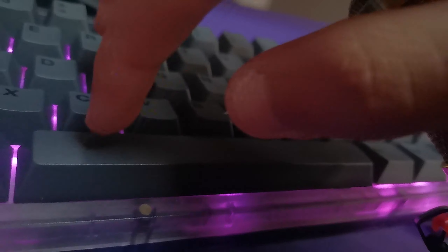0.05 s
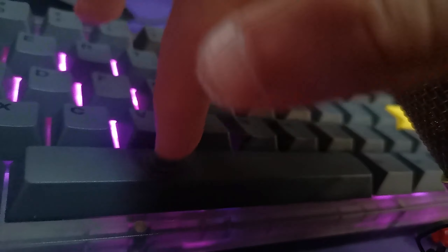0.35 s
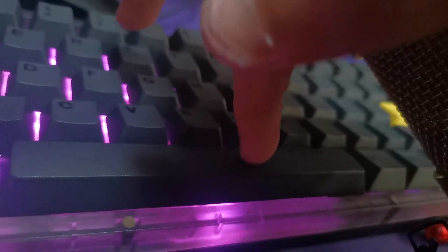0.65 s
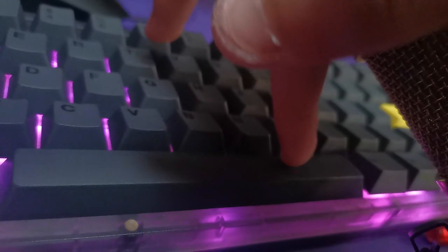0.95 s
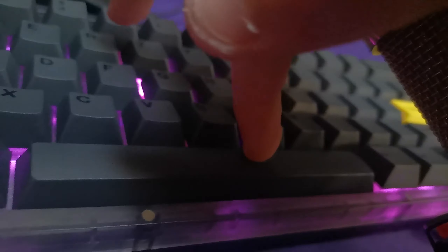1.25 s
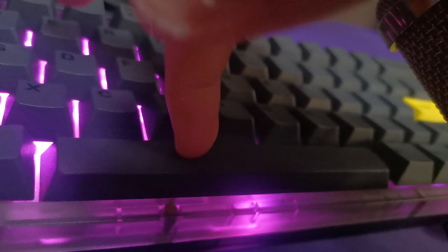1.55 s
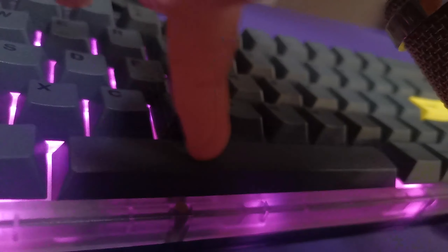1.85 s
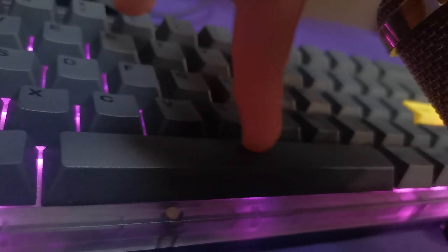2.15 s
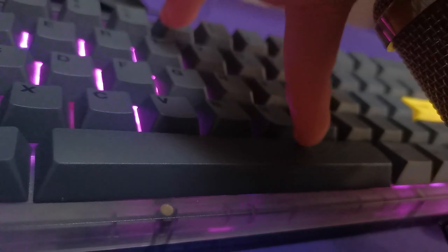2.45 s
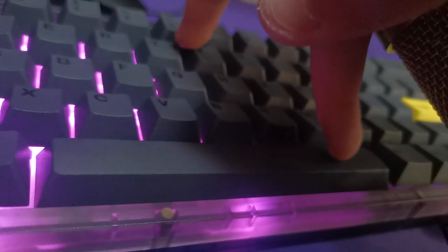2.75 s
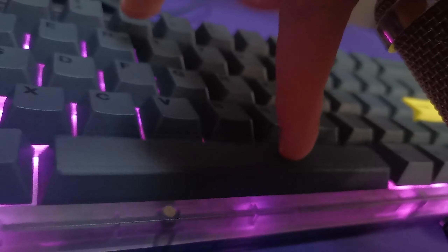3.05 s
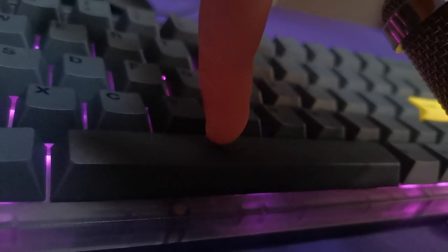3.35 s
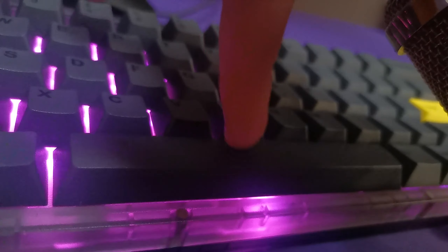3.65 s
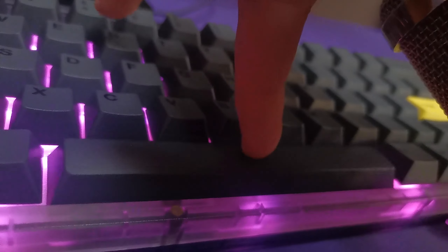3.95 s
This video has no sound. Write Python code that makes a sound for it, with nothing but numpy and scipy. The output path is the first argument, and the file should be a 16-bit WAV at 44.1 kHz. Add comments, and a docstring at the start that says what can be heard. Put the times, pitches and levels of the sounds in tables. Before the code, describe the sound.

A mechanical keyboard's space bar is tapped rapidly, close up in a quiet room. From about 0.3 seconds, presses come roughly six times a second, each a plastic clack with a soft desk thud, followed by a second clack as the bar springs back. Near 2.8 seconds the sound drops out briefly; tapping resumes around 3 seconds and continues until 4. Faint hiss and low rumble lie underneath.

```python
"""Quiet room, close to a mechanical keyboard on a desk: one finger taps the space bar about 6 times a second.
Per stroke: soft fingertip thump, plastic clack at bottom-out, second clack as the bar springs back.
Case and desk thud under each blow; skin scuffs the keycap. Faint hiss and desk rumble underneath.
The sound drops out once, briefly, and cuts back in with a faint click and a barely audible subsonic swell."""
import sys
import numpy as np
from scipy import signal
from scipy.fft import rfft, irfft, next_fast_len
from scipy.io import wavfile

SR = 44100
rng = np.random.default_rng(int(sys.argv[2]) if len(sys.argv) > 2 else 0)


def dump(signal):
    """Clip the signal to [-1, 1] and save it as 16-bit WAV at the path in sys.argv[1]."""
    limited = np.clip(np.atleast_2d(signal).T, -1, 1)
    pcm = np.round(limited * 32767).astype(np.int16)
    wavfile.write(sys.argv[1], SR, pcm)


N = 176400

# bar bottoms out: start_s, clack_db, treble_db, thud_db, finger_travel_s
PRESSES = [(0.2844, -44.5, -65.5, -44, 0.023), (0.4378, -37.5, -47, -36, 0.017),
           (0.6105, -43.5, -57.5, -39, 0.022), (0.7583, -42.5, -56.5, -39.5, 0.025),
           (0.92, -44.5, -67.5, -42.5, 0.026), (1.0787, -48.5, -72.5, -48.5, 0.038),
           (1.227, -39, -52.5, -38, 0.019), (1.4048, -42.5, -57, -40.5, 0.034),
           (1.565, -44, -59.5, -43.5, 0.034), (1.7191, -43.5, -55.5, -40, 0.0284),
           (1.8736, -41, -53.5, -38.5, 0.021), (2.029, -44.5, -59, -42, 0.038),
           (2.1906, -43.5, -56, -41.5, 0.0253), (2.364, -42.5, -55.5, -39.5, 0.026),
           (2.529, -41, -56, -39.5, 0.0245), (2.7009, -42.5, -58.5, -43.5, 0.032),
           (3.0533, -43.5, -61, -43.5, 0.0299), (3.2403, -43.5, -56, -41.5, 0.026),
           (3.4156, -44, -55.5, -39, 0.024), (3.5784, -42.5, -52.5, -37, 0.018),
           (3.7432, -40, -51, -36, 0.022), (3.916, -42.5, -52.5, -35.5, 0.019)]
# bar hits its top stop: start_s, clack_db, treble_db, thud_db, ping_db
RELEASES = [(0.3606, -38.5, -65.5, -43, -1), (0.5169, -42, -57.5, -45.5, -5), (0.6784, -46, -56, -47.5, 4),
            (0.8311, -43.5, -58.5, -46, 7), (1.0054, -60, -73, -63, 10), (1.1507, -42.5, -54.5, -43, 10.5),
            (1.313, -44, -56, -47, 10), (1.4904, -47, -63, -48.5, 5), (1.6495, -42.5, -56, -45, 4.5),
            (1.801, -43, -56.5, -41.5, 1.5), (1.9576, -49.5, -64, -47, 0),
            (2.1073, -44.5, -60.5, -44.5, -1), (2.2756, -43.5, -61.5, -49.5, -4),
            (2.4472, -43, -54.5, -49, 7), (2.6203, -45, -56, -46.5, 7), (2.785, -46, -57.5, -51.5, 7),
            (3.1361, -45.5, -56, -46, 8), (3.3232, -45.5, -60.5, -46.5, 10), (3.4967, -40, -53, -44.5, 8.5),
            (3.6563, -47, -57.5, -44, 6), (3.821, -43, -58, -47.5, 4), (3.9845, -40.5, -51.5, -45.5, 7)]
# faint clicks, the last as the sound cuts back in: start_s, level_db
FAINT_CLICKS = [(.259, -54.5), (.423, -56), (1.786, -54), (2.968, -60)]
# skin slides on the keycap: centre_s, level_db
SCUFFS = [(0.427, -72.5), (0.736, -70), (0.901, -67.5), (1.138, -71), (1.301, -64.5), (1.469, -64),
          (1.637, -67), (1.795, -64), (2.019, -64), (2.077, -68), (2.171, -68.5), (2.354, -67),
          (2.512, -69), (3.12, -70)]
# plastic bar: pitch_hz, t60_s, press_db, release_db
BAR_MODES = [(646, 0.0088, 4, -14), (806, 0.051, -13.5, -13.5), (1484, 0.032, -7.5, -12.5),
             (1740, 0.023, -3, -7), (2185, 0.0086, -5, -14), (2430, 0.013, -2.5, -21),
             (2781, 0.025, -8.5, -8), (3110, 0.027, -16, -21), (4940, 0.0064, -1.5, -8),
             (5320, 0.0078, -4, 0.5), (9634, 0.0075, 2.5, -10.5)]
# case: pitch_hz, t60_s, press_db, release_db
CASE_MODES = [(327.6, 0.046, -0.5, 0.5), (460, 0.027, -15.5, -7)]
# keyboard on the desk: pitch_hz, t60_s, press_db, release_db, touch_db
DESK_MODES = [(82.3, 0.12, 4, -36, -20.5), (134.1, 0.14, 5, -3, 0), (182.7, 0.067, 5, 10, 2)]
# plastic contact: freq_hz, level_db
CRACK_SPECTRUM = [(200, 7.5), (950, -19), (1300, -9), (1720, 5.5), (2600, -2), (4000, -13), (5200, -10.5),
                  (6500, -14.5), (9500, -12), (15000, -32.5)]
# hollow of the case: freq_hz, level_db
HOLLOW_SPECTRUM = [(130, -14.5), (290, 4.5), (600, -4.5), (1600, -48)]
# skin friction: freq_hz, level_db
SKIN_SPECTRUM = [(1500, 6), (2500, 1), (2950, 10.5), (3700, -10), (8000, 10.5), (10500, 3.5), (15000, -11)]
# steady hiss: freq_hz, level_db
HISS_SPECTRUM = [(250, 0), (1000, -6), (2000, -7.5), (2900, -13), (3900, -27), (5200, -19), (8000, -14),
                 (12200, -21), (13700, -55)]
# desk rumble: freq_hz, level_db
RUMBLE_SPECTRUM = [(10, -2), (60, -4), (140, -7.5), (220, -21), (380, -25), (900, -64)]

PRESS, RELEASE, TOUCH = 0, 1, 2  # level column in the mode tables
CRACK_DB, CHATTER_DB, THUD_DB = 24, -9, -1.5
REF_CLACK_DB, REF_TREBLE_DB = -40, -11
TREBLE_FROM_HZ, PING_BAND_HZ = 4740, (2600, 3300)
TIME_S, RING_TIME_S = np.arange(N) / SR, np.arange(SR // 5) / SR


def presses(soft_s=0.0013, finger_push_s=0.0009, sink_lag_s=0.0078):
    """Fingertip lands; bar bottoms out and shakes the desk; case sinks on its feet and comes back."""
    out = np.zeros(N)
    fingertip = np.exp(-np.linspace(-4, 4, round(8 * soft_s * SR)) ** 2 / 2)
    sink = -amp(2.5) * sway(width_s=0.0023)
    for start_s, clack_db, treble_db, thud_db, travel_s in PRESSES:
        add(out, start_s + sink_lag_s - len(sink) / SR / 2, amp(thud_db) * sink)
        landing = ring(DESK_MODES, TOUCH) + amp(18) * push(finger_push_s)
        thump = signal.fftconvolve(landing, fingertip / fingertip.sum())
        touch_s = start_s - travel_s - len(fingertip) / SR / 2 - finger_push_s / 2
        add(out, touch_s, amp(thud_db) * thump)
        bright_db = treble_db - clack_db - REF_TREBLE_DB
        add(out, start_s, -amp(clack_db) * clack(bright_db, PRESS))
        add(out, start_s, case_knock(clack_db, PRESS))
        thud = ring(DESK_MODES, PRESS) + push(width_s=0.0035)
        add(out, start_s, amp(thud_db + THUD_DB) * thud)
    return out


def releases(desk_lag_s=0.00333, tug_lag_s=0.0013):
    """Spring throws the bar against its top stop and tugs the case."""
    out = np.zeros(N)
    tug = amp(9) * sway(width_s=0.0025)
    for start_s, clack_db, treble_db, thud_db, ping_db in RELEASES:
        bright_db = treble_db - clack_db - REF_TREBLE_DB
        add(out, start_s, amp(clack_db) * clack(bright_db, RELEASE, ping_db))
        add(out, start_s + desk_lag_s, -amp(thud_db + THUD_DB) * ring(DESK_MODES, RELEASE))
        add(out, start_s + desk_lag_s, -case_knock(clack_db, RELEASE))
        add(out, start_s + tug_lag_s - len(tug) / SR / 2, amp(thud_db) * tug)
    return out


def clack(bright_db, blow, ping_db=0, ring_rise_s=0.00029):
    """Plastic on plastic: crack, gritty snap, chatter, ring of the bar."""
    lead_samples = SR // 1000
    highpass = lambda hz: 1 / (1 + (TREBLE_FROM_HZ / (hz + 1)) ** 6)
    crack = np.pad(amp(CRACK_DB) * click(CRACK_SPECTRUM), (lead_samples, 0))
    treble = filtered(crack, highpass)
    snap = smear(treble, t60_s=0.0075)  # stem and both stabilisers touch down
    chatter = amp(CHATTER_DB) * smear(crack, t60_s=0.012)  # micro-bounces
    bar = ring(BAR_MODES, blow, ping_db) * -np.expm1(-RING_TIME_S / ring_rise_s)
    mix = crack - treble + snap + chatter + np.pad(bar, (lead_samples, 0))
    return filtered(mix, lambda hz: amp(bright_db * highpass(hz)))[lead_samples - 8:]


def case_knock(clack_db, blow):
    """Hollow case rings under a clack; 0.5 dB per dB of clack level."""
    hollow = amp(12) * smear(click(HOLLOW_SPECTRUM), t60_s=0.05)
    return amp((clack_db + REF_CLACK_DB) / 2) * (ring(CASE_MODES, blow) + hollow)


def faint_clicks():
    """Light clicks: three among the strokes, one as the sound cuts back in."""
    out = np.zeros(N)
    for start_s, level_db in FAINT_CLICKS:
        add(out, start_s, amp(level_db) * clack(bright_db=-0.5, blow=RELEASE))
    return out


def scuffs(half_length_s=0.014, grain_db=3.5, grain_hz=500):
    """Skin on the keycap: short, grainy swells of sliding friction."""
    swells = sum(amp(level_db) * np.exp(-((TIME_S - centre_s) / half_length_s) ** 2)
                 for centre_s, level_db in SCUFFS)
    grain = amp(grain_db * noise(lambda hz: hz < grain_hz))
    grain /= np.sqrt(np.mean(grain ** 2))
    return swells * grain * noise(lambda hz: gain_at(SKIN_SPECTRUM, hz))


def background(hiss_db=-70, idle_db=-62, typing_db=-53.5, hand_on_s=0.245):
    """Steady hiss; desk rumble steps up once the hand is at work."""
    hiss = amp(hiss_db) * noise(lambda hz: gain_at(HISS_SPECTRUM, hz))
    rumble_db = np.interp(TIME_S, [hand_on_s - 0.01, hand_on_s], [idle_db, typing_db])
    return hiss + amp(rumble_db) * noise(lambda hz: gain_at(RUMBLE_SPECTRUM, hz))


def ring(modes, blow, ping_db=0, scatter_db=1.3, detune=0.003):
    """Damped modes, varied per blow; ping_db shifts those in the ping band."""
    low_hz, high_hz = PING_BAND_HZ
    out = np.zeros(len(RING_TIME_S))
    for pitch_hz, t60_s, *levels_db in modes:
        level_db = levels_db[blow] + ping_db * (low_hz < pitch_hz < high_hz) + scatter_db * rng.normal()
        detuned_hz = pitch_hz * (1 + detune * rng.normal())
        out += amp(level_db) * decay(t60_s) * np.sin(2 * np.pi * detuned_hz * RING_TIME_S)
    return out


def push(width_s):
    """Low shove and rebound."""
    u = RING_TIME_S / width_s
    return u * (2 - u) * np.exp(-u)


def sway(width_s):
    """One swing of the case between two smaller counter-swings."""
    u = np.linspace(-5, 5, round(10 * width_s * SR))
    return (1 - u * u) * np.exp(-u * u / 2)


def click(spectrum):
    """Minimum-phase click, unit energy."""
    n = len(RING_TIME_S)
    cepstrum = irfft(np.log(gain_at(spectrum, np.fft.rfftfreq(n, 1 / SR))), n)
    causal = (np.arange(n) > 0) & (np.arange(n) < n // 2)
    x = irfft(np.exp(rfft(2 * cepstrum * causal)), n)
    return x / np.linalg.norm(x)


def smear(x, t60_s):
    """Convolve with decaying noise of unit energy."""
    burst = rng.standard_normal(len(RING_TIME_S)) * decay(t60_s)
    return signal.fftconvolve(x, burst / np.linalg.norm(burst))[:len(x)]


def decay(t60_s):
    """Exponential envelope."""
    return np.exp(-np.log(1000) * RING_TIME_S / t60_s)


def noise(response):
    """Coloured noise, unit rms."""
    x = filtered(rng.standard_normal(N), response)
    return x / x.std()


def filtered(x, response):
    """Zero-phase filter with gain response(hz)."""
    n = next_fast_len(len(x) + SR // 10)
    return irfft(rfft(x, n) * response(np.fft.rfftfreq(n, 1 / SR)), n)[:len(x)]


def gain_at(spectrum, hz):
    """Gain from a spectrum table, log frequency axis."""
    freq_hz, level_db = np.transpose(spectrum)
    return amp(np.interp(np.log(hz + 1), np.log(freq_hz + 1), level_db))


def amp(db):
    """dB to gain."""
    return 10 ** (np.asarray(db) / 20)


def add(track, start_s, x):
    """Mix x in at start_s."""
    part = track[round(start_s * SR):][:len(x)]
    part += x[:len(part)]


def scene():
    """Close keyboard, faint short room, background."""
    direct = presses() + releases() + faint_clicks() + scuffs()
    room = amp(-12) * smear(direct, t60_s=0.053)
    return (direct + room + background())[None]


def record(dry):
    """Brief dropout; sound cuts back in with a barely audible subsonic swell; band limit."""
    mute_s, resume_s, top_hz = 2.836, 2.967, 15600
    x = dry[0] * ((TIME_S < mute_s) | (TIME_S > resume_s))
    add(x, resume_s, -amp(-28) * push(width_s=0.022))
    return filtered(x, lambda hz: hz < top_hz)[None]


dry = scene()
out = record(dry)
dump(out)
```